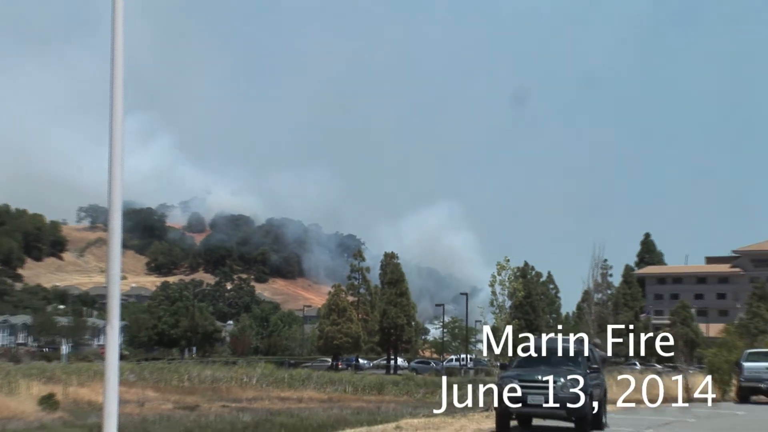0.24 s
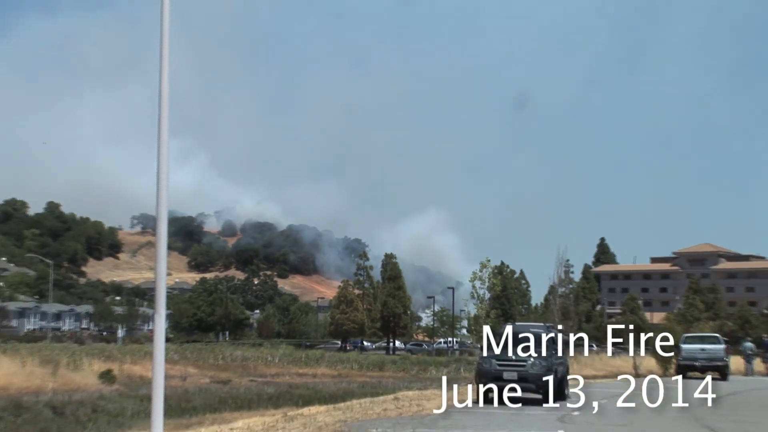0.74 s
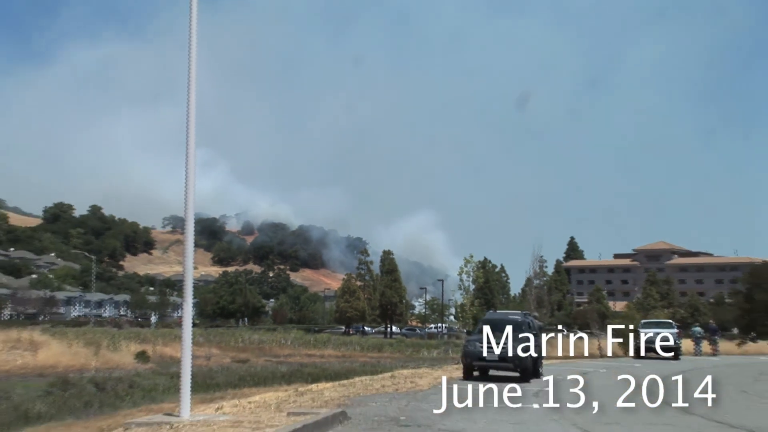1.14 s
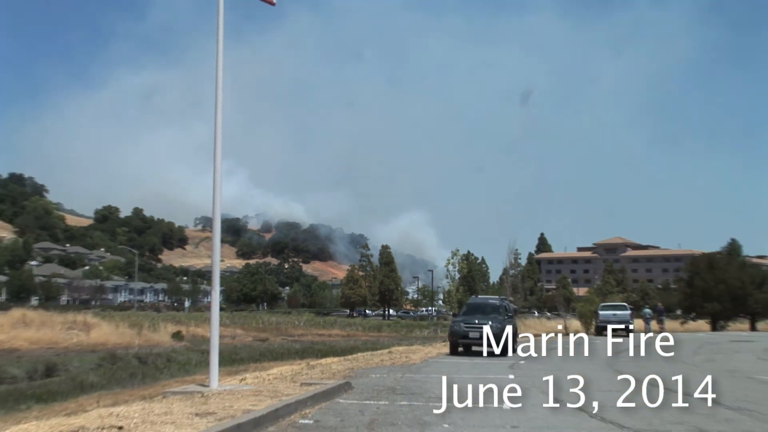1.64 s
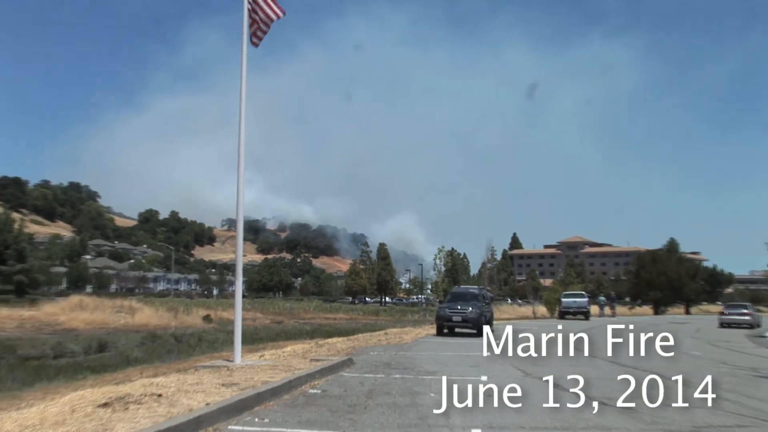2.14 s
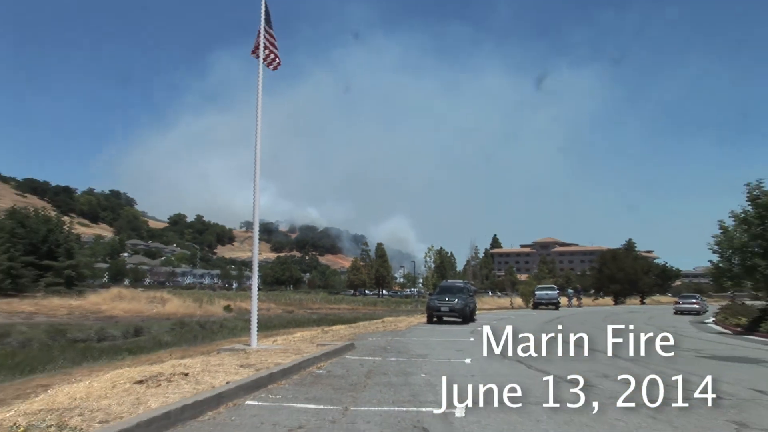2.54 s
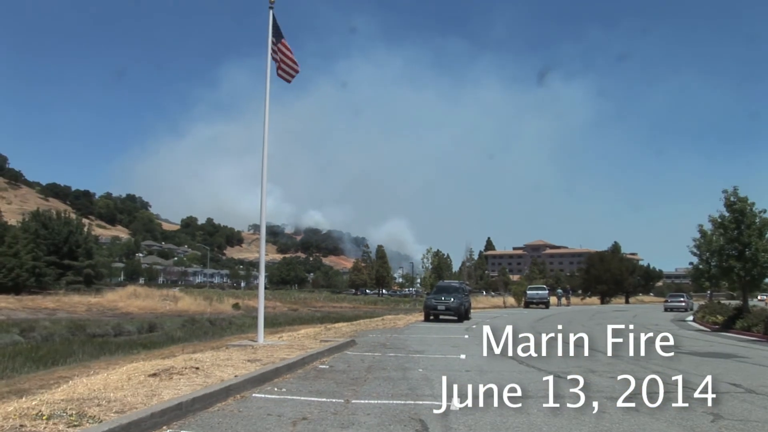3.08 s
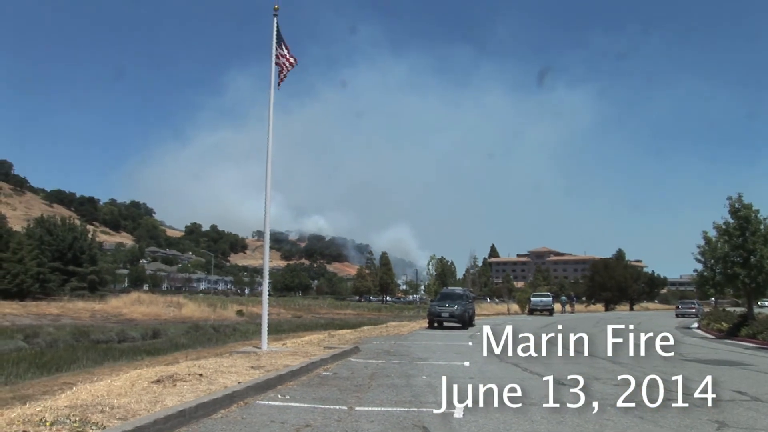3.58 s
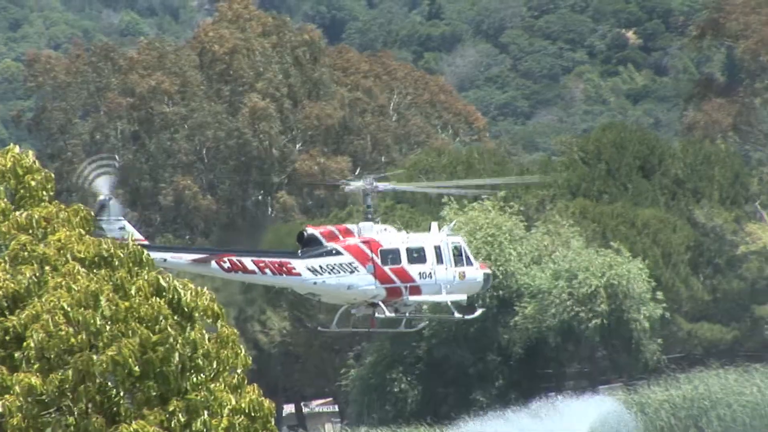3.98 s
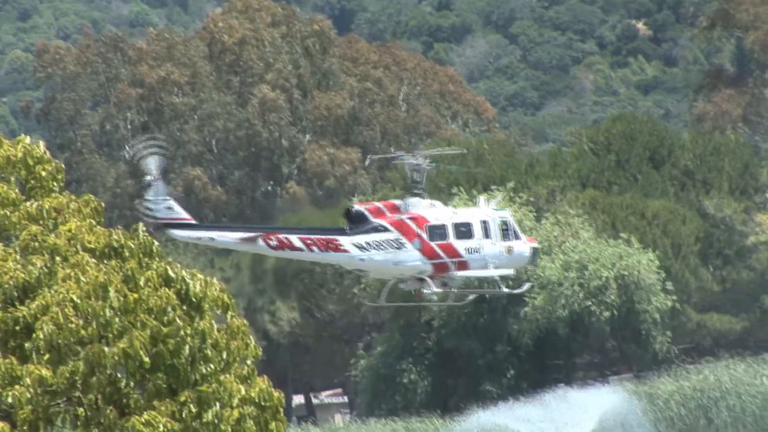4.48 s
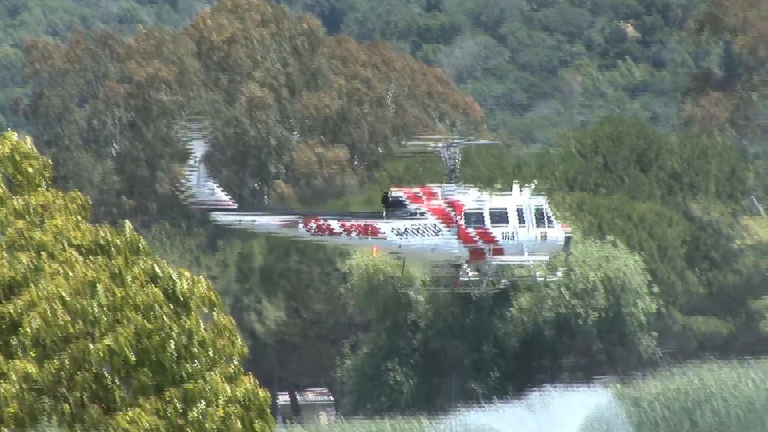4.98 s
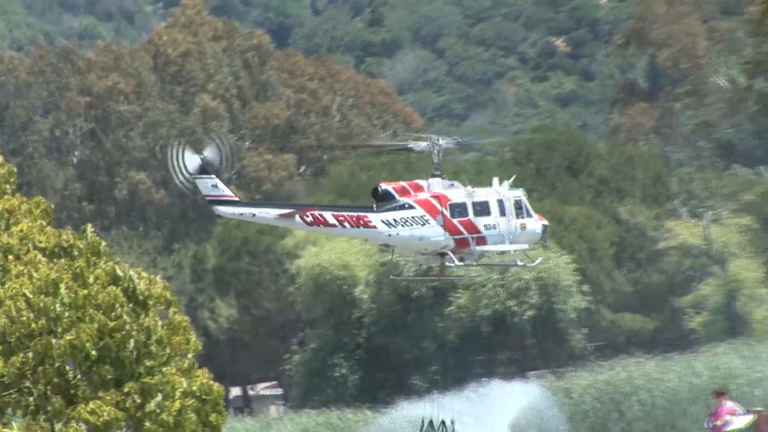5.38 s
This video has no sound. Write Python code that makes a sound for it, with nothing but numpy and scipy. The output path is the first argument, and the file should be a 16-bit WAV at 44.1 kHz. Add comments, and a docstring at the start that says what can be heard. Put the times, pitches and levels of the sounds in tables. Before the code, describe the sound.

Soft, muffled idling and road rumble cut suddenly to a nearby helicopter chopping rapidly over throbbing rotors, rushing downwash and bright hiss.

```python
"""A quiet roadside: an engine hums over distant traffic while a camera's zoom motor whines faintly.
Then, abruptly, a two-bladed helicopter is close by: every blade slaps through the rotor's wake and
trails a rattle of weaker slaps, over the throb of the rotors, the downwash and the hiss of the turbine.
Tones are sine waves, rushing and hissing sounds are shaped noise, and slaps are short pulses."""
import sys
import numpy as np
from scipy import signal
from scipy.fft import rfft, irfft
from scipy.io import wavfile
from scipy.ndimage import uniform_filter1d, minimum_filter1d

SR = 44100
rng = np.random.default_rng(int(sys.argv[2]) if len(sys.argv) > 2 else 0)


def output_pcm(signal):
    """Save a mono or channel-first signal as 16-bit PCM at the path in sys.argv[1].

    Samples are clipped to [-1, 1] before scaling.
    """
    pcm = np.clip(np.atleast_2d(signal).T, -1, 1) * 32767
    wavfile.write(sys.argv[1], SR, np.round(pcm).astype(np.int16))


N = 247842
TIME = np.arange(N) / SR

CUT_S = 3.847   # the helicopter sounds from here on
FIRST_BLADE_S, BLADE_HZ = 3.8646, 10.654
USUAL_BITE_DB = -20   # main slap when the blades cut their wake as hard as usual, before its parts are set

# Colour of the rush of air around the rotor: pitch_hz [Hz], density_db [dB per Hz, relative]
AIR_RUSH = [(190, -31), (330, -0.5), (372, -25), (423, -5), (509, -2), (741, 2), (885, -3.5), (985, -2),
            (1210, 2.5), (1440, -7.5), (1560, -5.5), (1680, -18), (1800, -3), (2340, -52), (3960, -120)]
# Colour of the turbine's hiss: pitch_hz [Hz], density_db [dB per Hz, relative]
TURBINE_HISS = [(940, -42), (1600, -12.5), (1720, -32), (1860, -2), (2180, 1), (3000, -6), (3240, -7.5),
                (4080, -13), (4340, -21.5), (4600, -35), (5980, -45), (10100, -120)]


def from_db(db):
    """Turn decibels into a plain gain."""
    return 10 ** (np.asarray(db) / 20)


def rms_one(x):
    """Scale a sound to an rms level of 1."""
    return x / np.sqrt(np.mean(x ** 2) + 1e-20)


def curve(rows):
    """Join a table of (time_s, value) rows with straight lines, one value per sample."""
    time_s, value = np.transpose(rows)
    return np.interp(TIME, time_s, value)


def bump(center_s, length_s):
    """A smooth swell to 1 and back, centred on a time."""
    return np.exp(-((TIME - center_s) / length_s) ** 2)


def band(x, low_hz, high_hz):
    """Keep the sound between two pitches."""
    edges_hz = [low_hz, min(high_hz, SR / 2 - 1)]
    return signal.sosfilt(signal.butter(2, edges_hz, "band", fs=SR, output="sos"), x + 1e-18)


def drift(rate_hz):
    """A random wander with spread 1; a higher rate wanders faster."""
    hz = np.fft.rfftfreq(N, 1 / SR)
    return rms_one(irfft(rfft(rng.standard_normal(N)) / (1 + (hz / rate_hz) ** 2), N))


def noise(spectrum):
    """Noise of rms 1 with the given spectrum, falling steeply beyond its ends."""
    hz, db = np.transpose(spectrum)
    f = np.fft.rfftfreq(N, 1 / SR) + 1e-3
    inside = from_db(np.interp(np.log(f), np.log(hz), db))
    beyond_ends = np.minimum(1, np.minimum(f / hz[0], hz[-1] / f)) ** 4
    return rms_one(irfft(rfft(rng.standard_normal(N)) * inside * beyond_ends, N))


def idling_engine():
    """A smooth, muffled idle: a firing tone and a hum at twice its rate, wandering together."""
    # Level of the hum: time_s [s], level_db [dB, before a small trim]
    hum = [(0, -33.5), (.3, -33.5), (1.0, -42.5), (1.22, -36), (1.42, -48), (1.75, -42.5), (1.9, -36),
           (2.25, -50), (2.85, -48), (3.8, -40)]
    # Level of the firing tone: time_s [s], level_db [dB]
    firing = [(1.25, -40.5), (1.4, -44), (3.0, -48), (3.8, -41)]
    hum_hz, speed_wander = 151.3, 0.0027   # the wander is a share of the speed
    phase = 2 * np.pi * np.cumsum(hum_hz * (1 + speed_wander * drift(1.15))) / SR
    firing_tone = from_db(curve(firing)) * np.sin(phase / 2)
    hum_tone = from_db(curve(hum) + 0.06) * np.sin(phase + rng.uniform(0, 2 * np.pi))
    return np.sqrt(2) * (firing_tone + hum_tone)   # the root makes the levels rms


def far_motors():
    """Drones of other vehicles: sine tones that swell and fade with wandering level and phase."""
    # Fainter drones: loudest_s [s], length_s [s], pitch_hz [Hz], relative_db [dB]
    drones = [(3.1, 2.3, 98.9, -48.5), (2.9, 4.2, 159, -52), (0.807, .35, 226, -47),
              (2.666, 0.18, 256, -49), (3.64, 0.22, 160, -57)]
    out = 0
    for loudest_s, length_s, pitch_hz, relative_db in drones:
        level = from_db(relative_db + 1.5 + 1.7 * drift(1.5)) * bump(loudest_s, length_s)
        out = out + level * np.sin(2 * np.pi * pitch_hz * TIME + .5 * drift(4.9))
    return np.sqrt(2) * out


def traffic():
    """Low rumble and slowly fading tyre noise from the road, swelling briefly as a car goes by."""
    # Colour of the road's rumble: pitch_hz [Hz], density_db [dB per Hz, relative]
    rumble_colour = [(11, -40.5), (18, -3), (65, -1), (153, -2), (172, -3.5), (200, -8.5), (268, -7),
                     (359, -13.5), (600, -28), (780, -33), (1320, -120)]
    # Colour of the tyre noise: pitch_hz [Hz], density_db [dB per Hz, relative]
    tyre_colour = [(260, -38), (450, -1.5), (594, -3.5), (672, -6), (1090, -1.5), (1960, -8), (2510, -14.5),
                   (3080, -19), (3710, -29), (4330, -33), (4550, -35.5), (4950, -33), (5260, -35),
                   (6840, -54.5), (11600, -120)]
    car_swell_db = 2 * bump(0.62, 0.31)
    rumble = from_db(-39.5 + car_swell_db + 0.32 * drift(6.8)) * noise(rumble_colour)
    tyres = from_db(-48.5 - 0.58 * TIME) * noise(tyre_colour)   # fades 0.58 dB per second
    passing = from_db(-50.5) * bump(1.0, 0.19) * noise([(450, -6), (600, 2), (750, -13)])
    return rumble + tyres + passing


def camera(whine_db, whirr_db):
    """The zoom motor's thin whine, its whirr at full speed, and ticks and a tiny squeak of the housing."""
    # Tones of the zoom motor: pitch_hz [Hz], relative_db [dB, raised by whine_db]
    motor_tones = [(3295, -81), (3898, -92.5), (4194, -84), (4495, -96), (4797, -84.5), (5394, -94),
                   (5696, -92), (5992, -92)]
    # Light handling ticks: start_s [s], relative_db [dB]
    handling_ticks = [(0.412, -60), (0.5891, -58), (1.7998, -49), (3.1906, -55), (3.2994, -63),
                      (3.458, -53)]
    whine = sum(from_db(db + whine_db) * np.sin(2 * np.pi * hz * TIME + 0.68 * drift(6))
                for hz, db in motor_tones)
    full_speed = np.interp(TIME, [1.9, 2.05, 2.7, 2.9], [0, 1, 1, 0])
    whirr = from_db(whirr_db) * full_speed * rms_one(band(rng.standard_normal(N), 3070, 3135))
    # each tick starts at once and dies away in about 5 ms
    touch = sum(from_db(db - 4) * (TIME >= start_s) * np.exp(-abs(TIME - start_s) / .005)
                for start_s, db in handling_ticks)
    tick_colour = [(1600, 5), (3500, 0), (4200, -6), (5000, -1), (6200, -1), (7500, -17), (14000, -15)]
    ticks = touch * noise(tick_colour)
    squeak = from_db(-67) * bump(3.203, 0.016) * np.sin(2 * np.pi * 5850 * TIME + drift(100))
    return whine + whirr + ticks + squeak


def chirps(buzz_hz, rise_per_s):
    """Short, hoarse, far-off chirps: a rising buzz heard through two high resonances."""
    # Faint far chirps: center_s [s], length_s [s], relative_db [dB, before the resonances]
    far_chirps = [(2.587, 0.033, -56), (3.004, 0.027, -50.5), (3.367, 0.018, -59)]
    out = 0
    for center_s, length_s, relative_db in far_chirps:
        t = np.clip(TIME - center_s, -4 * length_s, 4 * length_s)
        pitch_hz = buzz_hz * np.exp(rise_per_s * t + 0.0081 * drift(100))
        phase = 2 * np.pi * np.cumsum(pitch_hz) / SR
        buzz = sum(np.sin(k * phase + rng.uniform(0, 2 * np.pi)) for k in range(7, 15))
        out = out + from_db(relative_db) * np.exp(-(t / length_s) ** 2) * buzz
    return band(out, 1960, 2300) + from_db(-5.5) * band(out, 2820, 3080)


def rustles():
    """Soft brushes of a hand on the housing: brief swells of noise in a narrow range."""
    # Handling rustles: center_s [s], length_s [s], pitch_hz [Hz, near the top of the range], level_db [dB]
    brushes = [(2.974, .008, 13000, -75), (3.198, 0.013, 13000, -69), (3.308, .02, 3000, -61),
               (3.796, 0.018, 2500, -49.5)]
    out = 0
    for center_s, length_s, pitch_hz, level_db in brushes:
        brush = rms_one(band(rng.standard_normal(N), pitch_hz * 0.71, pitch_hz * 1.05))
        out = out + from_db(level_db) * bump(center_s, length_s) * brush
    return out


def bite(s):
    """How much harder than usual the blades cut their own wake, in dB."""
    # Strength of the cut: time_s [s], level_db [dB, main slap before its parts are set]
    wake_cut = [(3.86, -29), (4.15, -25.5), (4.25, -24), (4.43, -29), (4.53, -12.5), (4.95, -11),
                (5.2, -17.5), (5.6, -23)]
    return np.interp(s, *np.transpose(wake_cut)) - USUAL_BITE_DB


def blades():
    """Evenly spaced blade passages: times, and levels of the main slap, the trailing slaps and the thump."""
    s = np.arange(FIRST_BLADE_S, TIME[-1], 1 / BLADE_HZ)
    extra_db = bite(s)
    # trail and thump change less than the main slap does
    return s, USUAL_BITE_DB + extra_db, -27 + 0.6 * extra_db, -18 + 0.44 * extra_db


def chop_db():
    """The air swells and sinks by 1 dB at the blade rate, loudest 18 ms after each blade."""
    return np.cos(2 * np.pi * BLADE_HZ * (TIME - FIRST_BLADE_S - 0.018))


def gust_db():
    """Gusts briefly lift the rush of air."""
    # Gusts: center_s [s], length_s [s], lift_db [dB]
    gusts = [(4.07, 0.037, 1.5), (4.259, .03, 1.5), (4.836, 0.12, 3.5)]
    return sum(lift_db * bump(center_s, length_s) for center_s, length_s, lift_db in gusts)


def rotor_throb(waver, scatter):
    """Harmonics of the blade rate, loosely in step with the blades, coloured by an echo."""
    # Level of the harmonics before the echo: pitch_hz [Hz], relative_db [dB]
    throb_colour = [(10.7, -29.5), (21, -9), (32, -6), (55, -2), (90, -3), (165, -3.5), (230, -7),
                    (280, -11), (340, -18)]
    echo_s, ripple_db = .0182, 5   # the echo lifts about every fifth harmonic
    knots = np.linspace(0, TIME[-1], num=24)
    out = 0
    for multiple in range(1, 33):
        hz = multiple * BLADE_HZ
        db = np.interp(hz, *np.transpose(throb_colour)) + ripple_db * np.cos(2 * np.pi * hz * echo_s)
        # each harmonic has its own random phase offset, which also wavers
        wavering = waver * np.interp(TIME, knots, rng.standard_normal(len(knots)))
        phase = scatter * rng.standard_normal() + wavering
        out = out - from_db(db) * np.cos(2 * np.pi * hz * (TIME - FIRST_BLADE_S) + phase)
    return rms_one(band(out, 45, 900))


def throb_and_downwash():
    """Rotor throb and low wind from the blades, growing together as the helicopter closes in."""
    # Colour of the low downwash: pitch_hz [Hz], density_db [dB per Hz, relative]
    downwash_colour = [(35, -30), (60, -20.5), (80, -12), (134, -3.5), (166, -0.5), (194, -5.5),
                       (275, -2.5), (372, -17), (420, -21), (550, -52), (920, -120)]
    growing_db = -26 + 2.5 * (TIME - FIRST_BLADE_S)   # 2.5 dB per second
    throb = from_db(-.5) * rotor_throb(waver=1.08, scatter=1.6)
    downwash = from_db(-3) * noise(downwash_colour)
    return from_db(growing_db + 1.1 * chop_db()) * (throb + downwash)


def rushing_air():
    """Gusty wash that swells with each blade, and a narrow swish that is clearest at first."""
    wash_db = -31.6 + 0.31 * bite(TIME) + gust_db() + chop_db() + 3.6 * drift(79)
    wash = from_db(wash_db) * noise(AIR_RUSH)
    swish_db = -35 - 8 * np.maximum(TIME - FIRST_BLADE_S, 0) + chop_db()   # fades 8 dB per second
    swish = from_db(swish_db) * noise([(1130, -11.5), (1260, 0.5), (1400, -7)])
    return wash + swish


def turbine():
    """Turbine hiss with a thin flickering top; both follow the bite and the gusts a little."""
    # Colour of the highest hiss: pitch_hz [Hz], density_db [dB per Hz, relative]
    top_colour = [(4400, 3), (4730, -15.5), (5000, 1), (5500, -8.5), (6300, -15), (7200, -24),
                  (7900, -25.5), (8600, -19.5), (9200, -29), (9800, -22.5), (11000, -34.5), (15000, -39)]
    base_db = -31.8 + 0.096 * bite(TIME) + 0.45 * gust_db()
    flicker_db = 0.78 * chop_db() + 0.7 * drift(16) + 1.4 * drift(200)
    hiss = from_db(base_db + flicker_db) * noise(TURBINE_HISS)
    top = from_db(base_db - 19.5 + .8 * drift(25)) * noise(top_colour)
    return hiss + top


def strike(times, levels_db, shape):
    """Place one centred pulse shape at each of the times."""
    clicks, at = np.zeros(N), np.round(np.ravel(times) * SR).astype(int)
    np.add.at(clicks, at[at < N], from_db(np.ravel(levels_db))[at < N])
    return signal.fftconvolve(clicks, shape, "same")


def span(width_s):
    """Time around a pulse, counted in pulse widths."""
    return np.arange(-SR // 20, SR // 20 + 1) / SR / width_s


def suction(width_s):
    """A passing blade: pressure rises, drops sharply and rises again."""
    u = span(width_s)
    return (u ** 2 - 1) / (1 + u ** 2) ** 2


def bell(width_s):
    """A smooth, rounded pulse."""
    return np.exp(-span(width_s) ** 2 / 2)


def swing(hz, width_s):
    """A broad dip in pressure with a bulge on either side."""
    return -np.cos(2 * np.pi * hz * width_s * span(width_s)) * bell(width_s)


def ground(x, delay_s, echo_db):
    """The ground returns a slightly later copy."""
    return x + from_db(min(echo_db, 0)) * np.interp(TIME - delay_s, TIME, x, left=0)


def air_loss(x, corner_hz):
    """Distance takes the sharpest edge off a pulse."""
    return signal.sosfilt(signal.butter(6, min(corner_hz, SR / 2 - 1), fs=SR, output="sos"), x + 1e-18)


def blade_slaps(spike_db, crackle_db, fizz_db, rattle_db, thump_db, rattle_thump_db, jitter_s, scatter_db):
    """Each slap is a sharp suction spike on a broad thump, inside a burst of torn air."""
    # Slaps trailing each blade: delay_s [s, before jitter], relative_db [dB, before scatter]
    trailing_slaps = [(.015, -8), (0.0185, -2), (0.0309, -6), (0.036, -6.5), (0.0507, -4), (0.069, -3),
                      (0.0878, -5.5)]
    s, main_db, trail_db, low_db = blades()
    delay_s, step_db = np.transpose(trailing_slaps)
    late = s[:, None] + delay_s + jitter_s * rng.standard_normal((len(s), len(delay_s)))
    uneven_db = step_db + scatter_db * rng.standard_normal(late.shape)
    times = np.column_stack([s, late])
    levels = np.column_stack([main_db, trail_db[:, None] + uneven_db + rattle_db])

    sharp = strike(times - .0002, levels + spike_db, suction(0.00042))
    spikes = ground(air_loss(sharp, 3100), 0.0014, -2.6)
    crackle = strike(times, levels + crackle_db, bell(0.0021)) * noise(AIR_RUSH)

    # the bright part of a slap starts at once, dies away and differs from slap to slap
    u = span(0.0019)
    flare_db = levels + fizz_db + 2.3 * rng.standard_normal(times.shape)
    flare = strike(times - .0008, flare_db, np.exp(-abs(u)) * (u > 0))
    fizz = air_loss(flare * noise(TURBINE_HISS), 4060)

    lows = np.column_stack([(low_db + main_db) / 2, low_db[:, None] + uneven_db + rattle_thump_db])
    # a thump swings about once
    thumps = strike(times + 0.00043, lows + thump_db, swing(hz=160, width_s=.0023))
    return spikes + crackle + fizz + thumps


def blade_whump(level_db, low_hz, high_hz, delay_s):
    """The air pushed aside by each blade arrives as a deep suction pulse that swings on briefly."""
    s = blades()[0]
    pulses = strike(s + delay_s, np.full(len(s), level_db), -bell(0.0015))
    return band(pulses, low_hz, high_hz)


def cracks(level_db):
    """A blade tip cuts a vortex squarely: a sudden crack around one pitch that dies in a few milliseconds."""
    # Lone sharp cracks: time_s [s, 1 ms ahead of the peak], relative_db [dB, peak], pitch_hz [Hz, strongest]
    vortex_cracks = [(4.255, -10, 794), (4.367, -10.5, 735), (4.443, -10, 651), (4.519, -4, 770),
                     (4.633, -12, 762), (4.721, -3, 2140), (4.82, -3, 1230), (5.039, -10.5, 759),
                     (5.082, 1.5, 2480), (5.302, -11, 1230), (5.338, -9.5, 738), (5.489, -5, 2290)]
    rise_s, decay_s = .0004, .002
    out = 0
    for time_s, relative_db, hz in vortex_cracks:
        age = TIME - time_s - .001
        colour = [(hz * .7, -6), (hz, 0), (hz * 1.45, -3), (hz * 3.5, -10)]
        burst = noise(colour) * np.exp(np.minimum(age / rise_s, -age / decay_s))
        out = out + from_db(relative_db + level_db) * burst / np.max(abs(burst))
    return air_loss(out, 2700)


def helicopter():
    """Slaps, whumps and cracks of the blades over rotor throb, rushing air and turbine hiss."""
    slaps = blade_slaps(spike_db=8.0, crackle_db=-3.5, fizz_db=-1, rattle_db=2.5, thump_db=3,
                        rattle_thump_db=-3.5, jitter_s=0.00052, scatter_db=2.5)
    whump = blade_whump(level_db=-9, low_hz=28, high_hz=60, delay_s=0.0022)
    return throb_and_downwash() + rushing_air() + turbine() + slaps + whump + cracks(level_db=-1.5)


def scene():
    """The roadside gives way to the helicopter within a few milliseconds."""
    near = np.clip((TIME - CUT_S) / 0.011 + .5, 0, 1) * (TIME > CUT_S)   # jumps to half, then ramps to 1
    roadside = idling_engine() + far_motors() + traffic() + camera(whine_db=4.0, whirr_db=-74.0)
    roadside = roadside + rustles() + chirps(buzz_hz=235, rise_per_s=1.6)
    return ((1 - near) * roadside + near * helicopter())[None]


def record(dry):
    """Faint microphone hiss is added, subsonic pressure is lost, a limiter holds the peaks, the top is cut."""
    # Colour of the microphone hiss: pitch_hz [Hz], density_db [dB per Hz, relative]
    hiss_colour = [(5000, 3), (7000, 1.5), (11000, 4), (15000, 1.5)]
    hissy = dry + from_db(-79.5) * noise(hiss_colour)
    x = signal.sosfilt(signal.butter(1, 12, "high", fs=SR, output="sos"), hissy)
    gain = minimum_filter1d(.9 / np.maximum(abs(x), .9), size=361)
    gain = uniform_filter1d(uniform_filter1d(gain, size=181), size=181)   # smooth the limiter's moves
    return signal.sosfilt(signal.cheby2(14, 60, 15800, fs=SR, output="sos"), x * gain)


dry = scene()
out = record(dry)
output_pcm(out)
```